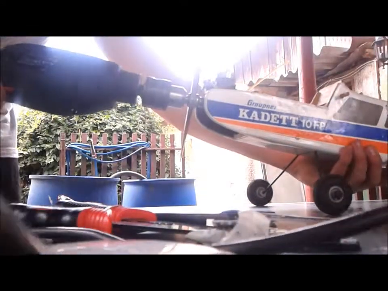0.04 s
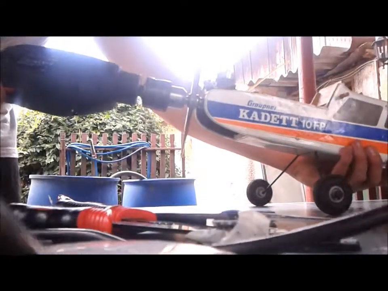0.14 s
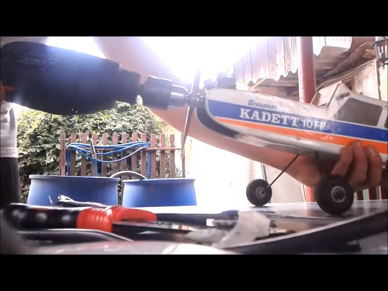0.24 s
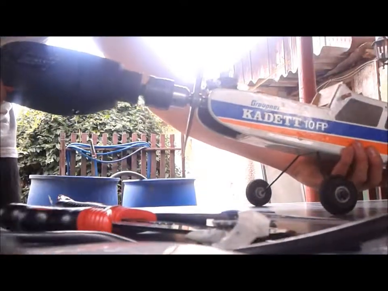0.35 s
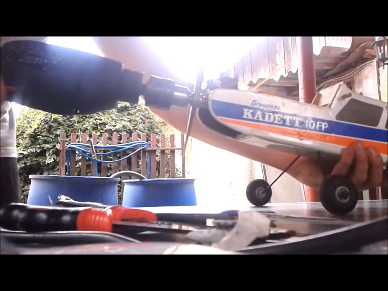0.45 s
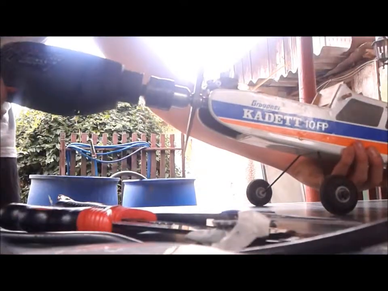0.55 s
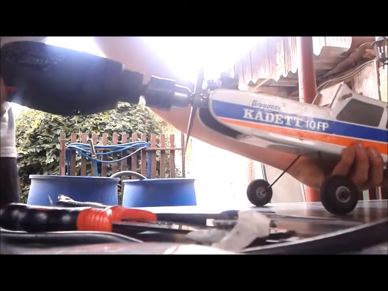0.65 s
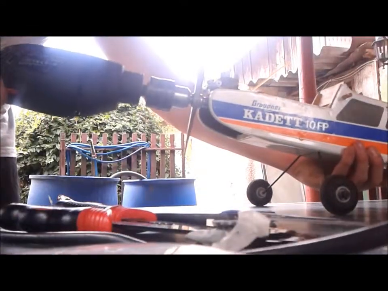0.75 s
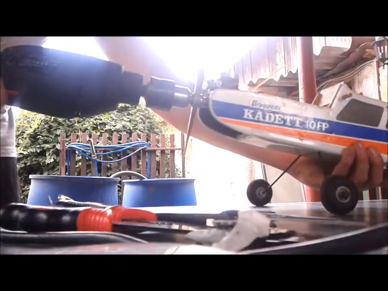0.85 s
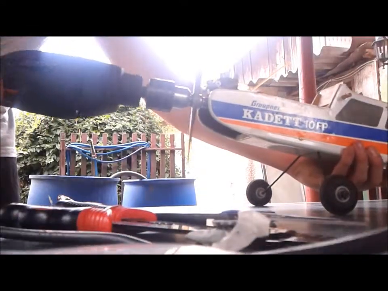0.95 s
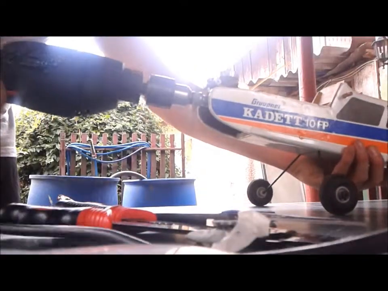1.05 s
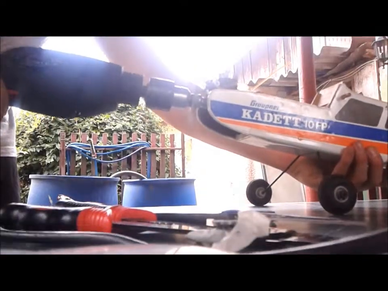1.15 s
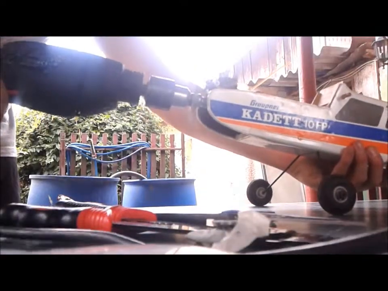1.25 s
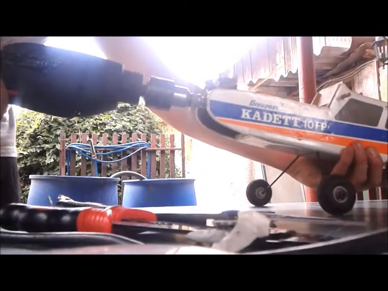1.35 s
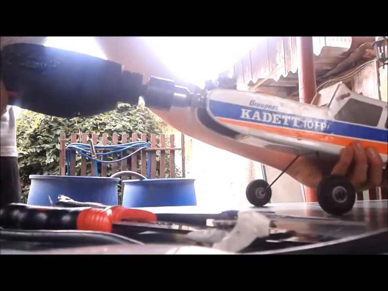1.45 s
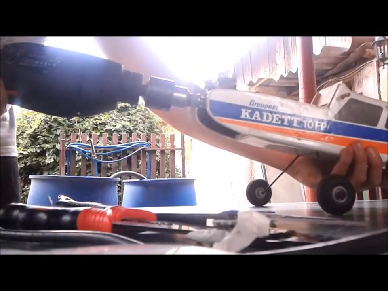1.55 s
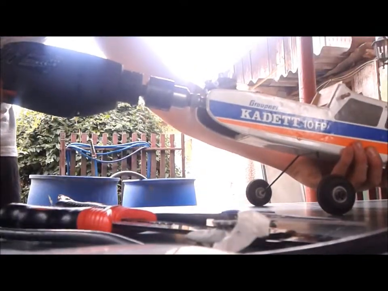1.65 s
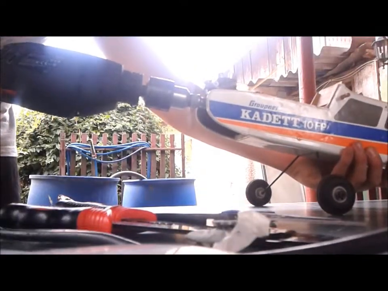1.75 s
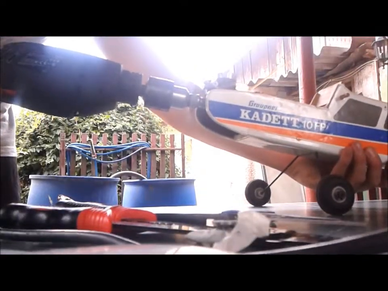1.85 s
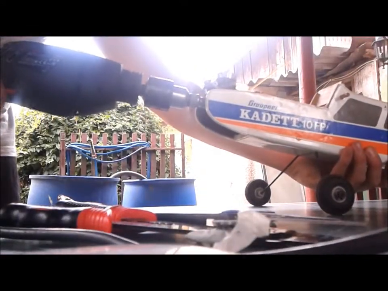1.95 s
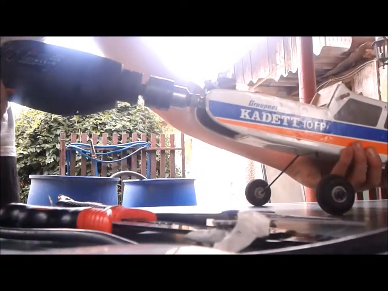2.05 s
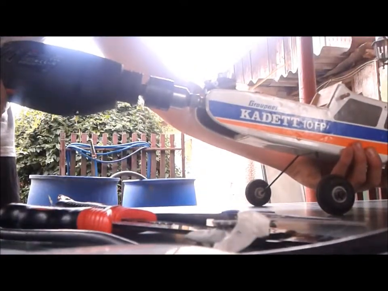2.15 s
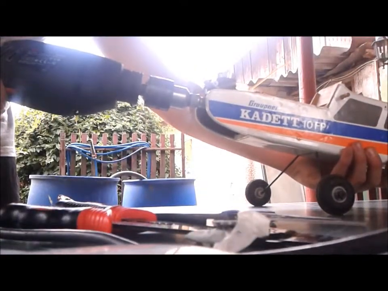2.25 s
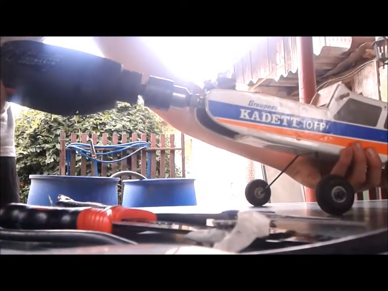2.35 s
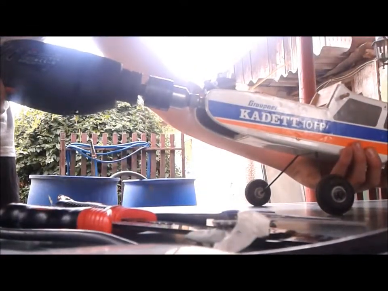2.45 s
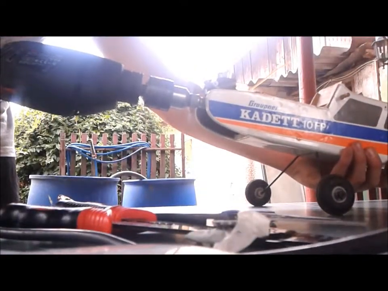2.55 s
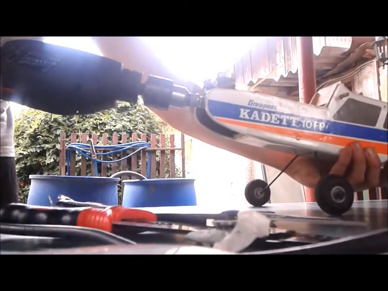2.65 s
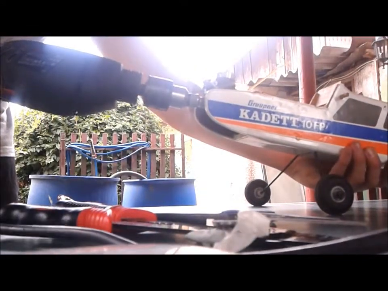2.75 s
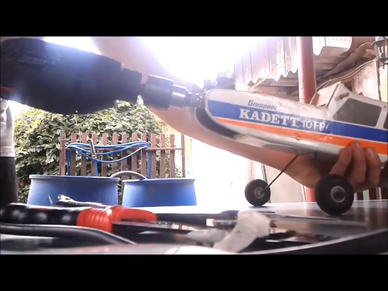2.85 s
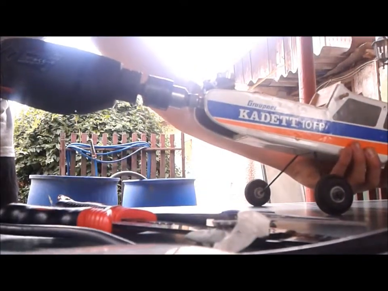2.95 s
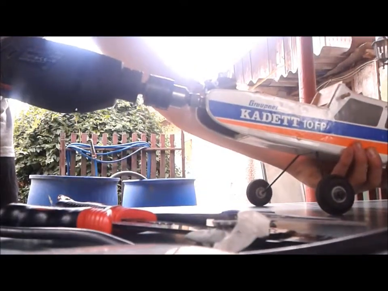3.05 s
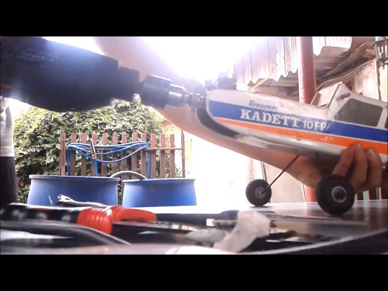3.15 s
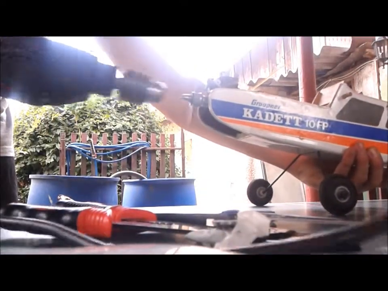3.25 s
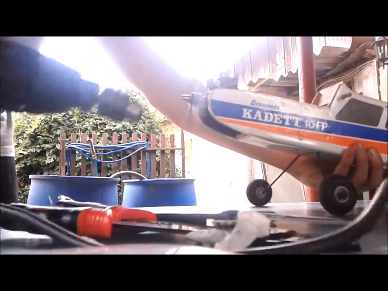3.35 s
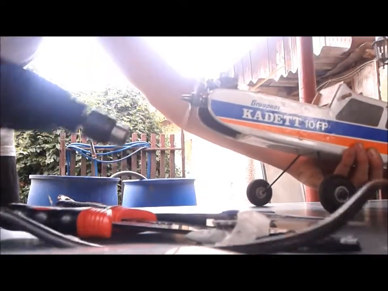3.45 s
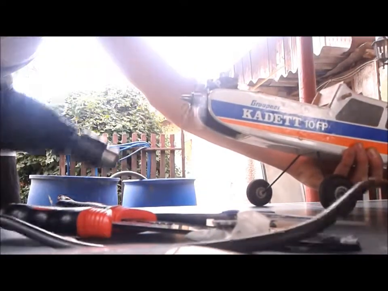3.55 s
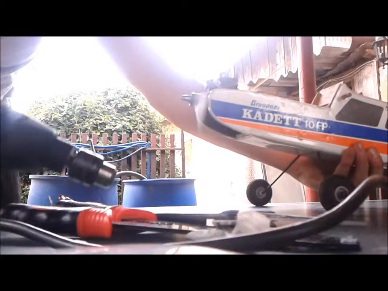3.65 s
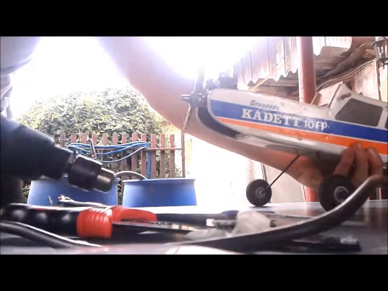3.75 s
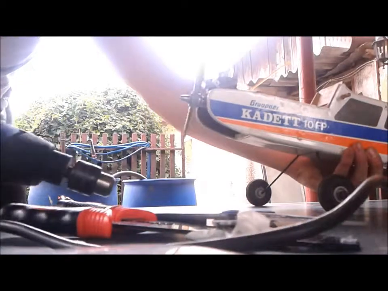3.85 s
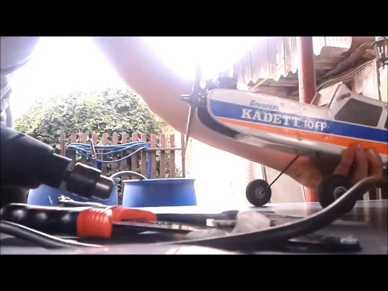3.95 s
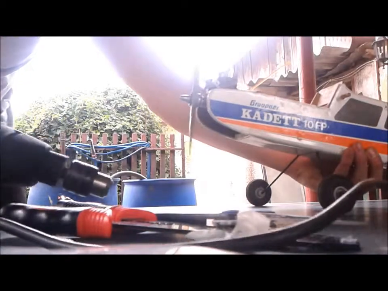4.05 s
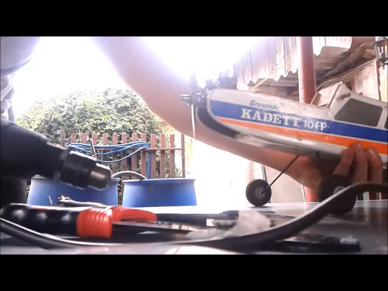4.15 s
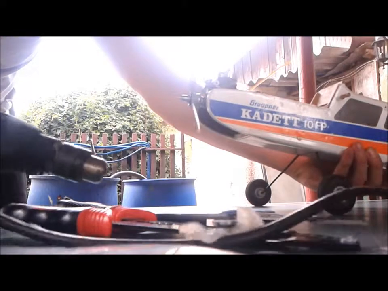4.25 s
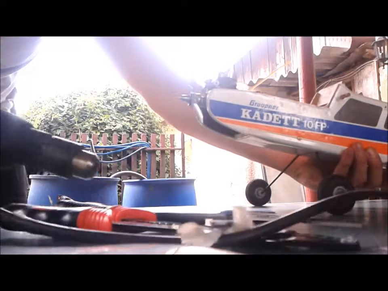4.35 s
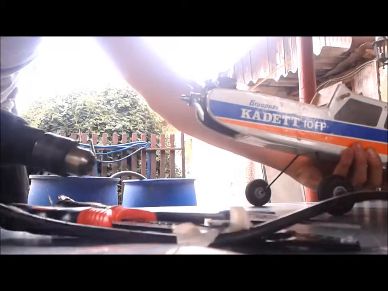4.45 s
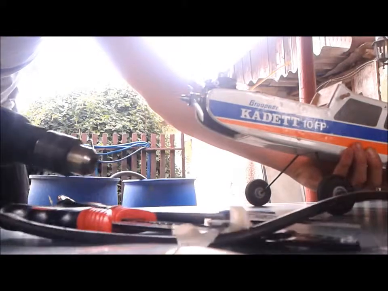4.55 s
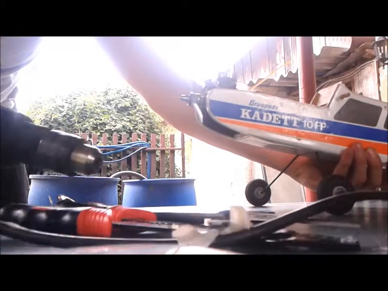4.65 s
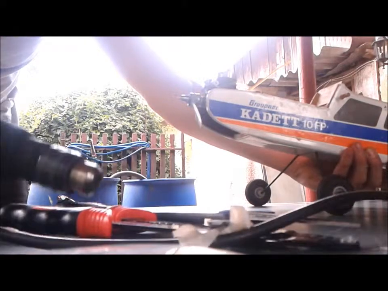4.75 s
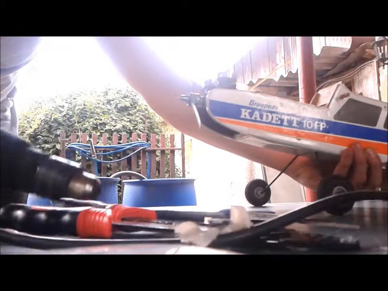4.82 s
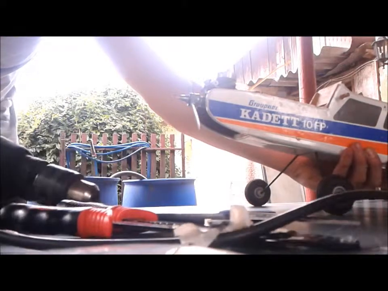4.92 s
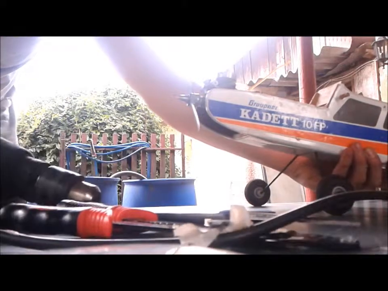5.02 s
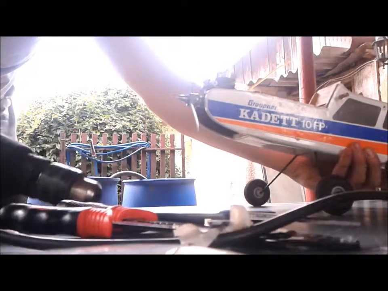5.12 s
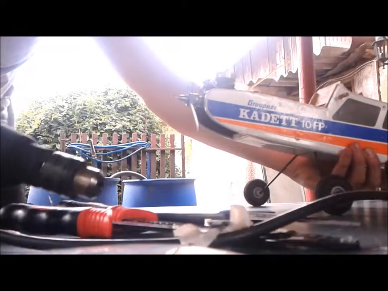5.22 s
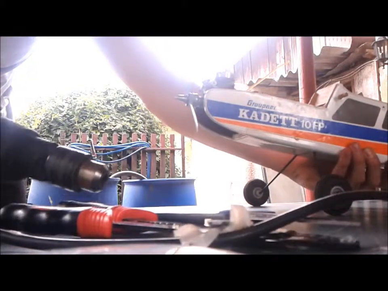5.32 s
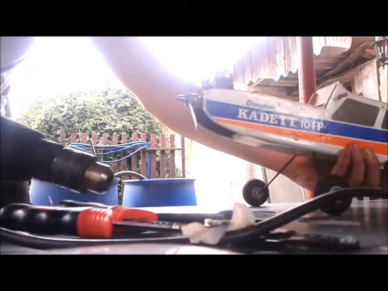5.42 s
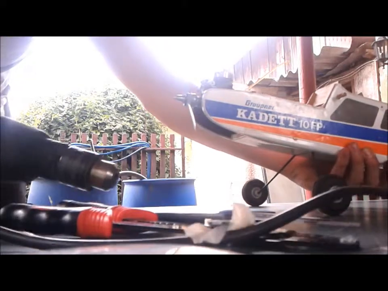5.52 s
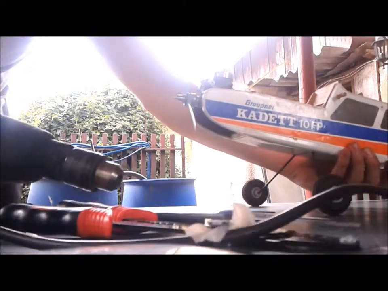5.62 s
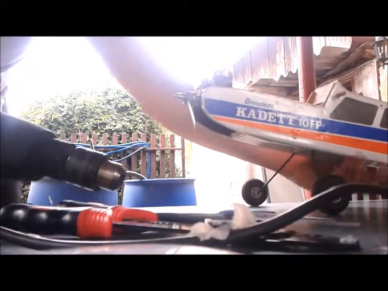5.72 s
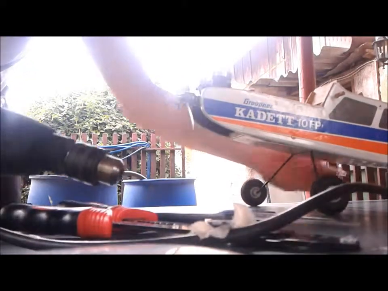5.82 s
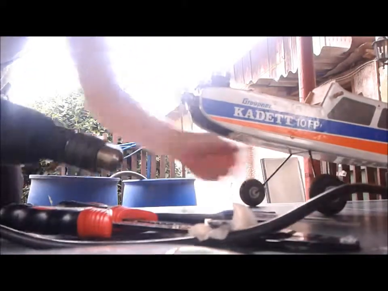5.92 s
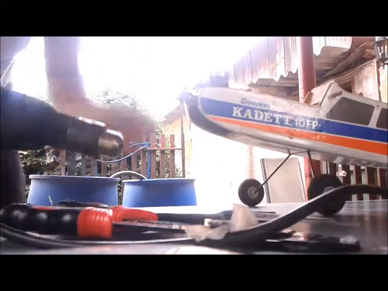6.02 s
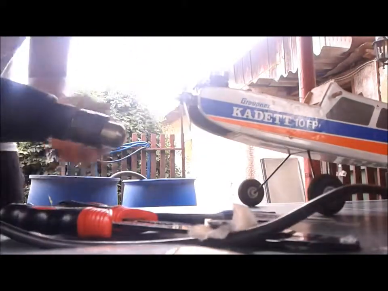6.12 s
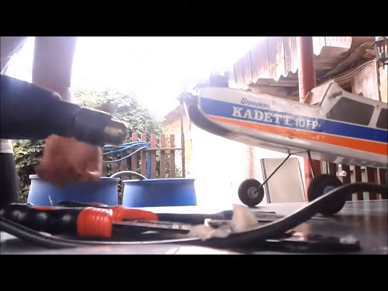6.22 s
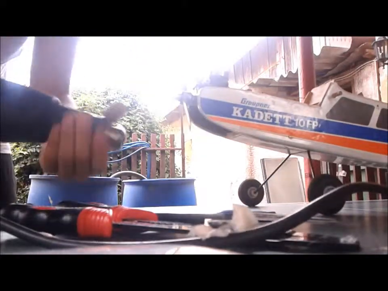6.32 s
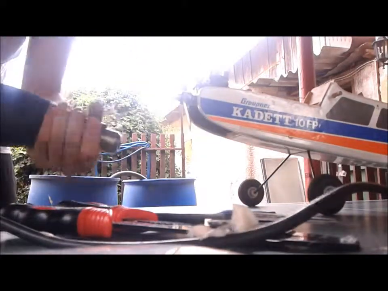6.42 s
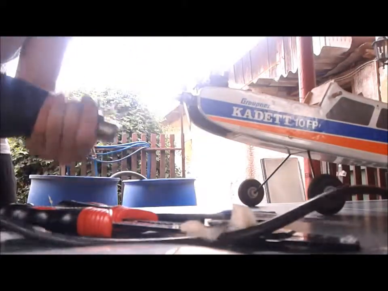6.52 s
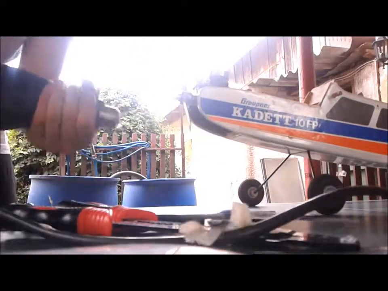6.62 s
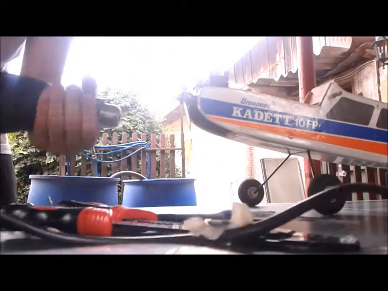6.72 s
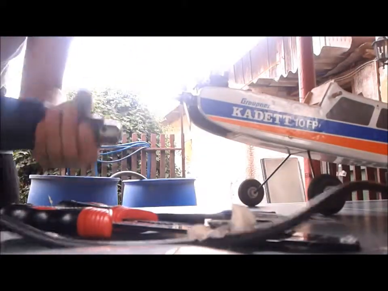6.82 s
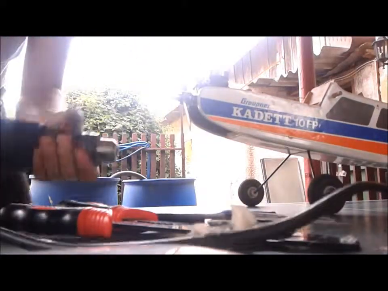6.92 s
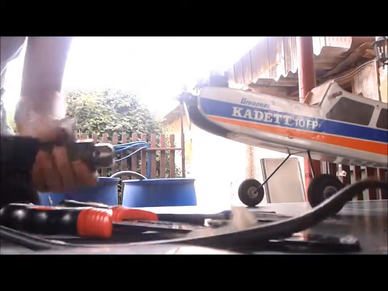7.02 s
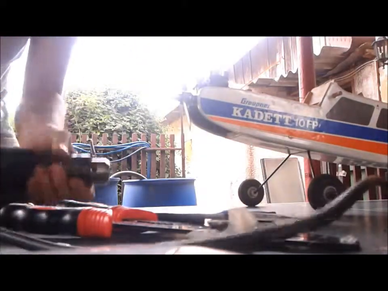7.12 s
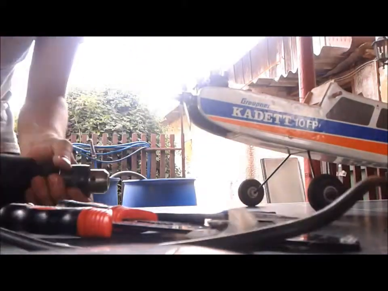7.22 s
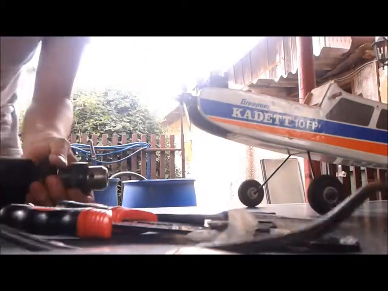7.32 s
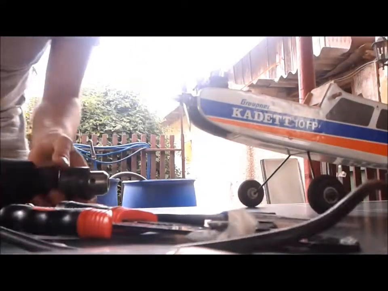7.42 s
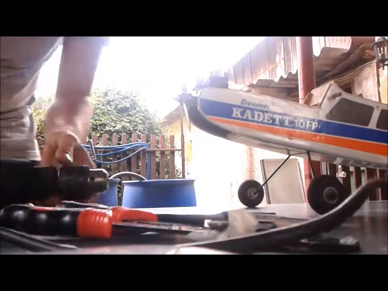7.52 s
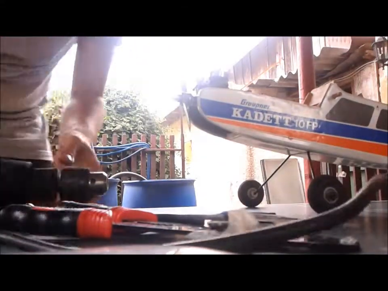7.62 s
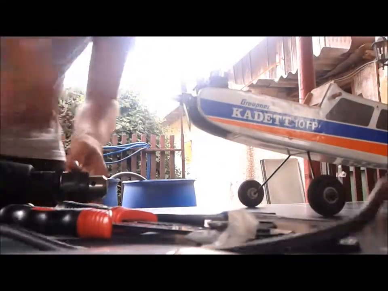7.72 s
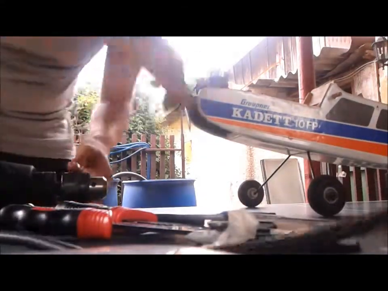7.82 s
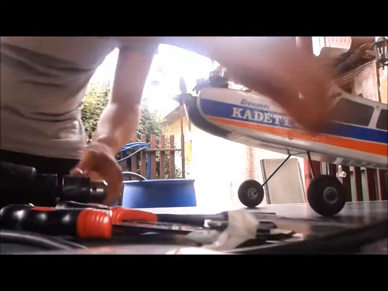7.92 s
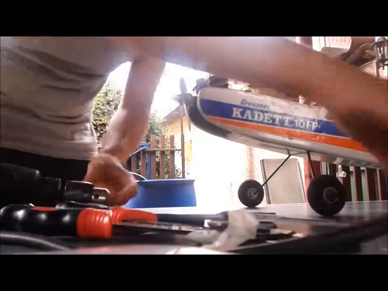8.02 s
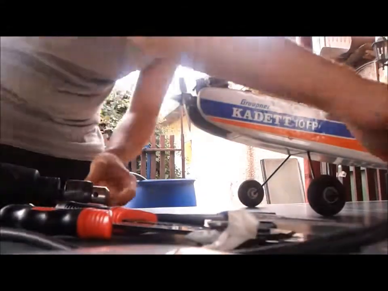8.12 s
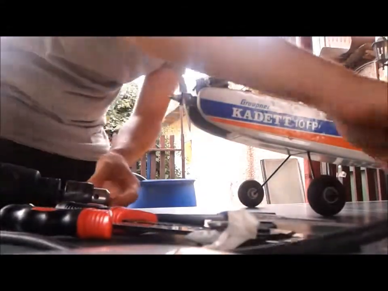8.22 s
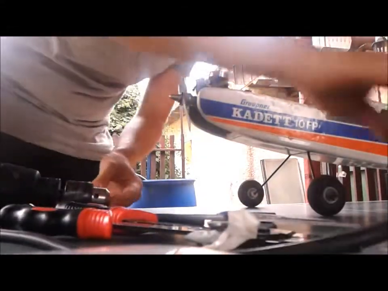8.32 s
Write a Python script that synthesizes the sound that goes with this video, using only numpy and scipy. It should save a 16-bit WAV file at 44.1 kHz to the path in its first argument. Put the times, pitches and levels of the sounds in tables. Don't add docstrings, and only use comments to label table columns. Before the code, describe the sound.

From 0 to 0.8 s, sleeves rub and shift, with dull small knocks around 0.35 s. At 0.86 s the trigger and gears snap and click; a gritty drill burst rises until about 1.06 s with a brief squeal, then sags as it cranks a small engine, puffing and ticking rapidly. A stronger squeeze comes at 1.66-1.93 s, sagging again, then a long one from 2.47 to 3.4 s, climbing to a loud, distorted roar with hiss and whine. Engine puffing ends near 3.15 s as the drill pulls away. From 3.4 s it coasts smoothly down in pitch and level; hard rattling knocks hit at 4.9-4.97 s. At 6.35 s a hand brakes it: groan, gear chatter, sharp catch at 6.5 s, silence of the motor by 7.0 s. Heavy table thuds with clinks cluster at 7.27 s, then sliding, light knocks, a faint skin squeak near 7.97 s, a thump at 8.03 s and a last knock at 8.25 s. Close, dry tabletop pickup, low room noise.

```python
import sys
import numpy as np
from scipy import signal
from scipy.fft import rfft, irfft, next_fast_len
from scipy.io import wavfile
from scipy.ndimage import uniform_filter1d

SR = 44100
rng = np.random.default_rng(int(sys.argv[2]) if len(sys.argv) > 2 else 0)


def unload_audio(sound):
    columns = np.transpose(np.atleast_2d(sound))
    steps = np.round(np.clip(columns, -1, 1) * 32767)
    wavfile.write(sys.argv[1], SR, steps.astype(np.int16))


def elevation(decibels):
    levels = np.asarray(decibels, float)
    return 10 ** (levels / 20)


N = 369116

ENGAGE_S, PART_S, AWAY_S = 0.953, 3.15, 0.52
GRIP_S, STOP_S = 6.38, 7.0


def rms_one(x):
    return x / np.sqrt(np.mean(x ** 2) + 1e-20)


def ramp(start_s, length_s):
    return np.clip((np.arange(N) / SR - start_s) / length_s, 0, 1)


def swells(rows):
    t = np.arange(0, N + 8, 8) / SR
    total = 0
    for at, db, rise, t60 in rows:
        fall_db = 60 * np.clip(t - at - rise, 0, 9) / t60
        total = total + np.clip((t - at) / rise, 0, 1) * elevation(db - fall_db)
    return np.interp(np.arange(N) / SR, t, total)


def colour(x, spectrum, peaks=()):
    size = next_fast_len(N)
    hz = np.arange(1, size // 2 + 2) * SR / size
    knots, level_db = np.transpose(spectrum)
    db = np.interp(np.log(hz), np.log(knots), level_db)
    db -= 30 * np.abs(np.log2(hz / np.clip(hz, knots[0], knots[-1])))
    for top, width, lift_db in peaks:
        db += lift_db / (1 + (2 * (hz - top) / width) ** 2)
    return rms_one(irfft(rfft(x, size) * elevation(db), size)[:N])


def drift(rate):
    r = np.exp(-2 * np.pi * rate / SR)
    return rms_one(signal.lfilter([1], [1, -2 * r, r * r], rng.standard_normal(N + SR))[SR:])


def grains(per_s, spread_db):
    size = elevation(spread_db * np.minimum(rng.exponential(1, N), 5)) * rng.choice([-1, 1], N)
    return size * (rng.random(N) < per_s / SR)


def ring(clicks, hz, t60):
    r, w = elevation(-60 / (t60 * SR)), 2 * np.pi * hz / SR
    return signal.lfilter([0, np.sin(w)], [1, -2 * r * np.cos(w), r * r], clicks + 1e-18)


def strike(events, modes, soft_s):
    s, db = np.transpose(events)
    chance_db = rng.normal(0, 2.5, (len(s), len(modes)))
    out = 0
    for k, (hz, mode_db, t60) in enumerate(modes):
        clicks = np.zeros(N)
        clicks[(s * SR).astype(int)] = elevation(db + mode_db + chance_db[:, k])
        out = out + (-1) ** k * ring(clicks, hz, t60)
    r = np.exp(-1 / (soft_s * SR))
    return signal.lfilter([1 - r], [1, -r], out)


def tones(turns, orders, levels_db, wobble_db):
    waver = np.sqrt(2) * elevation(wobble_db * drift(9.0))
    total = 0
    for k, (times, db) in enumerate(zip(orders, levels_db)):
        sine = np.sin(2 * np.pi * times * turns + k * k)
        total = total + elevation(db) * np.roll(waver, k * SR // 2) * sine
    return total


# frequency in Hz, level in dB per Hz.
FLOOR_SPECTRUM = [(15, -34), (25, -15), (60, -6.5), (202, -13), (378, -25), (584, -30), (1010, -12),
                  (1180, -18), (1470, -16.5), (8370, -39), (12200, -32), (15200, -42), (16500, -58)]


def background():
    floor = elevation(-45.5 - 5) * colour(rng.standard_normal(N), FLOOR_SPECTRUM)
    whine = np.sqrt(2) * elevation(-74) * np.sin(2 * np.pi * 12000 * np.arange(N) / SR)
    return floor + whine


# frequency in Hz, level in dB per Hz.
RUB_SPECTRUM = [(300, 0.5), (480, 1.5), (800, -1.5), (1400, -4.5), (2400, -8.5), (3000, -26.5), (4000, -37)]
# frequency in Hz, level in dB per Hz.
RUSTLE_SPECTRUM = [(3000, 1), (4000, 2.5), (9000, -0.5), (14000, -9), (17000, -2)]
# frequency in Hz, level in dB per Hz.
RUMBLE_SPECTRUM = [(30, -21), (65, -21), (125, 0.5), (300, 2), (450, -10.5)]
RESTLESS_DB = (-54.5, -62, -66.5)
# start in seconds, rub in dB, rise in seconds, t60 in seconds,
# rustle in dB over rub.
RUBS = [(0.0, -40, 0.0013, 0.6, -15), (.14, -34, .19, 0.14, -14), (.33, -30.5, 0.011, 0.4, -40),
        (.46, -46.5, 0.069, .4, -16), (.6, -47, 0.17, 0.81, -23), (6.9, -52, 0.076, 1, -10),
        (7.093, -41, .005, .25, -15), (7.19, -51, 0.042, .2, -9), (7.26, -26, 0.011, 0.38, -15),
        (7.5, -52.5, 0.11, 0.98, -10), (7.73, -46, 0.056, 0.99, -10.5), (8.026, -29.5, 0.0062, 0.52, -30),
        (8.24, -35.5, .01, 0.058, -9)]
# start in seconds, rumble in dB, rise in seconds, t60 in seconds.
SLIDES = [
    (0.0, -51, .002, 1.1),
    (.38, -52, 0.07, 0.57),
    (7.3, -33, 0.12, 0.22),
    (7.72, -37, 0.067, 1.1),
    (8.02, -35, .012, 0.4),
    (8.25, -43, 0.043, .9),
]
# start in seconds, level in dB,
# rise in seconds, t60 in seconds.
SNAPS = [(.8545, -29, .0015, 0.034), (.86, -36, 0.0039, 0.54), (.93, -25, 0.057, 0.41),
         (6.32, -21.5, 0.11, 0.71), (7.098, -50, .001, 0.052), (7.265, -31, .002, .07),
         (7.339, -48, .001, .03), (8.042, -39, 0.011, .5), (8.063, -30, .001, .02)]


def handling():
    rumble, rub, rustle = elevation(np.array(RESTLESS_DB))
    rumble = rumble + swells(SLIDES)
    rub = rub + swells(row[:4] for row in RUBS)
    rustle = rustle + swells(SNAPS)
    rustle = rustle + swells((s, db + over_db, rise, t60) for s, db, rise, t60, over_db in RUBS)
    scratch = rng.standard_normal(N) + .35 * rms_one(grains(1500, spread_db=3.5))
    out = elevation(-5.5 + 2.6 * drift(9.2)) * rumble * colour(rng.standard_normal(N), RUMBLE_SPECTRUM)
    out += rub * colour(scratch, RUB_SPECTRUM)
    return out + elevation(2.0 * drift(25)) * rustle * colour(scratch, RUSTLE_SPECTRUM)


# time in seconds, frequency in Hz, level in dB.
SQUEAK = [
    (7.95, 1510, -72),
    (7.97, 1430, -50),
    (8.01, 1350, -52),
    (8.028, 1370, -58),
]


def squeak():
    t = np.arange(N) / SR
    s, pitch_hz, level_db = np.transpose(SQUEAK)
    hz = np.interp(t, s, pitch_hz)
    db = np.interp(t, s, level_db, left=-120, right=-120)
    return elevation(db + 3 * drift(60)) * np.sin(2 * np.pi * np.cumsum(hz) / SR)


# time in seconds, knock peak in dB, boom in dB over knock,
# metal clink in dB over knock.
BLOWS = [(7.099, -35, -22, 16.5), (7.233, -34.5, -8, 6), (7.265, -6.5, -7, -14), (7.276, -9, -14, 4),
         (7.294, -12.5, -21, -21), (7.325, -32, -12, -1), (7.341, -26, -10, 10), (7.726, -29, -2, -2),
         (7.79, -43, 9, -10), (7.83, -34, 1, -7), (7.858, -42, 8, -1), (7.893, -40, -5, 6),
         (7.993, -35, -3, -4), (8.029, -13, -18, -20), (8.25, -17.5, -22, -20)]
# frequency in Hz, level in dB, t60 in seconds.
TABLE_TOP = [(238, 3, 0.072), (315, -1.2, 0.068), (406, -10, 0.073), (560, -1.5, 0.043), (820, -2.5, 0.02),
             (1080, -9.5, 0.046)]
# frequency in Hz, level in dB, t60 in seconds.
TABLE_FRAME = [(65.4, -3, 0.28), (129.5, 4.5, 0.14)]
# time in seconds, peak in dB.
HELD_BLOWS = [(.332, -19), (.345, -12.5), (.361, -10), (4.903, 2), (4.926, -9), (4.966, -3.5)]
# frequency in Hz, level in dB, t60 in seconds.
HELD_PARTS = [(121, -30, 0.17), (290, -1, 0.01), (500, 1, 0.013), (706, -4.5, 0.033)]
# time in seconds, peak in dB.
TICKS = [(0.856, -27), (0.8707, -18), (0.909, -17), (0.916, -7), (1.0056, -7), (1.0214, -26), (1.0264, -26),
         (6.497, -1), (6.58, -14), (7.2404, -34), (7.2602, -16), (7.325, -18), (7.79, -27), (7.8331, -31),
         (7.8945, -31), (8.0636, -22), (8.0874, -18.5)]
# frequency in Hz, level in dB, t60 in seconds.
CLINK = [(1212, -4.5, 0.031), (1510, 1.5, 0.017), (1770, 1.5, 0.036), (1760, 3.5, 0.02), (2170, 9, 0.004),
         (2420, 4, 0.018), (2870, -0.5, 0.017), (4100, -14, .015), (6800, -11, .012)]
# start in seconds, level in dB, rise in seconds, t60 in seconds.
SHAKES = [(4.922, -4.5, 0.0017, 0.12), (4.958, -11.5, 0.006, 0.075), (5.04, -40, .004, .1),
          (6.33, -25, 0.09, 0.48), (7.266, -30, .002, 0.063), (8.136, -30.5, 0.003, 0.2)]
# frequency in Hz, level in dB per Hz.
SHAKE_SPECTRUM = [(300, -26), (1000, 19), (2500, 15), (3500, 4), (8000, 2), (12000, 5), (16000, 2)]


def knocks():
    s, db, boom_db, clink_db = np.transpose(BLOWS)
    wood = strike(np.c_[s, db - 6], TABLE_TOP, soft_s=.0002)
    wood += strike(np.c_[s, db + boom_db - 1.5], TABLE_FRAME, soft_s=0.00057)
    wood += strike(HELD_BLOWS, HELD_PARTS, soft_s=0.00047)
    clinks = np.r_[np.c_[s, db + clink_db - 13], np.array(TICKS) - [0, 9]]
    metal = strike(clinks, CLINK, soft_s=.00003)
    rattle = rng.standard_normal(N) + rms_one(grains(2500, spread_db=5.0))
    return wood + metal + swells(SHAKES) * colour(rattle, SHAKE_SPECTRUM)


# frequency in Hz, width in Hz, lift in dB.
PUFF_PEAKS = [(132.5, 33, 12.5), (252.6, 53, 22), (380, 78, -5.5)]
# start in seconds, level in dB, rise in seconds, t60 in seconds.
PISTON_STRAINS = [
    (.9, -24, .1, 2.8),
    (1.6, -23, .3, 4.0),
]


def engine(turns):
    gear_ratio = .0968
    held = ramp(ENGAGE_S, .08) * (1 - ramp(PART_S - .04, 0.069))
    stroke = np.diff(np.floor(gear_ratio * turns), prepend=0) * elevation(rng.normal(0, 1.1, N))
    puff = colour(stroke, [(50, -6.5), (100, -14.5), (400, -6.0), (700, -37)], PUFF_PEAKS)
    burst = signal.lfilter([1], [1, -elevation(-60 / (0.0066 * SR))], stroke) * rng.standard_normal(N)
    tick = (elevation(-41) + swells(PISTON_STRAINS)) * colour(burst, ROAR_SPECTRUM)
    return held * (elevation(-27.5) * puff + tick)


# pull in seconds, rotor turns per second then, release in seconds,
# turns per second then, spin-up time in seconds.
SQUEEZES = [
    (.872, 30, 1.06, 298, .1),
    (1.66, 190, 1.93, 385, .17),
    (2.47, 286, 3.4, 482, .3),
]


def rotor_speed():
    t = np.arange(N) / SR
    air_drag = .000978
    pull, low, release, high, _ = np.transpose(SQUEEZES)
    speed = np.interp(t, np.c_[pull, release].ravel(), np.c_[low, high].ravel())
    for on, slow, off, fast, lag in SQUEEZES:
        share = np.expm1(-(t.clip(on, off) - on) / lag) / np.expm1(-(off - on) / lag)
        speed = np.where((t > on) & (t < off), slow + (fast - slow) * share, speed)
    coast = 1 / (1 / high[-1] + air_drag * np.maximum(t - release[-1], 0))
    coast *= np.exp(-(np.maximum(t - GRIP_S, 0) / .38) ** 1.5)
    return np.where(t > release[-1], coast, speed)


def level(law, speed):
    top_speed, full_effort = 480, 2000
    top_db, octave_db, free_db, effort_db, away_db, grip_db = law
    effort = uniform_filter1d(np.clip(np.gradient(speed) * SR / full_effort, 0, 1), size=1300)
    octaves, away = np.log2(np.maximum(speed, 20) / top_speed), ramp(PART_S, AWAY_S)
    moving_db = (octave_db + free_db * away) * octaves + effort_db * effort
    return top_db + moving_db + away_db * away + grip_db * ramp(GRIP_S + .04, .3)


# start in seconds, level in dB, rise in seconds, t60 in seconds.
CHATTER = [
    (6.33, -21, .1, 1.5),
]
# frequency in Hz, level in dB, t60 in seconds.
GEARBOX = [(530, 0, .07), (720, -3, .04), (1320, -1, .04), (1550, -4, .03), (1950, -8, .025),
           (2400, -7, .025), (2900, -7, .025), (4660, -14, .015)]
# time in seconds, peak in dB.
CATCHES = [
    (6.4966, -6),
    (6.581, -12),
]


def brake():
    chatter = 0
    for hz, db, t60 in GEARBOX:
        chatter = chatter + elevation(db) * rms_one(ring(grains(900, spread_db=3.5), hz, t60))
    catches = strike(CATCHES, [(hz, db, t60 / 2) for hz, db, t60 in GEARBOX[2:5]], soft_s=.00005)
    return swells(CHATTER) * (1 - ramp(STOP_S - .07, 0.079)) * rms_one(chatter) + catches


# start in seconds, level in dB, rise in seconds, t60 in seconds.
SQUEALS = [
    (.925, -13, .025, .07),
    (1.662, -12, .006, .14),
]
# start in seconds, level in dB, rise in seconds, t60 in seconds.
FAN_BITES = [
    (1.73, -30, .06, 2.6),
    (2.49, -27, .05, 2.6),
]


def squeal(turns):
    pulse = 1 + .6 * np.cos(2 * np.pi * 100 * (np.arange(N) / SR - .0085))
    start = swells(SQUEALS) * pulse * np.sin(2 * np.pi * 12 * turns + .5 * drift(150))
    held = swells(FAN_BITES) * np.sin(2 * np.pi * FAN[0] * turns + 1.0 * drift(120))
    return np.sqrt(2) * (start + held)


# frequency in Hz, level in dB per Hz.
ROAR_SPECTRUM = [(24, -51), (40, -27), (92, -19), (124, -19), (210, -16), (244, -10), (462, -3.5),
                 (518, -3.5), (928, 3), (1020, 2), (1460, 0), (3600, -11.5), (4680, -18), (7920, -120)]
# frequency in Hz, level in dB per Hz.
HISS_SPECTRUM = [(2600, -7), (3300, -5.5), (4480, -1.5), (5880, -2), (8250, 0.5), (9500, -3), (11300, -4.5),
                 (13500, -5.5), (16000, -12)]
# frequency in Hz, width in Hz, lift in dB.
HOUSING = [(593, 440, 3.5), (1500, 470, 5.5), (2228, 430, 5.5), (2756, 91, 3.5), (3457, 120, -9),
           (4544, 590, 5), (8200, 300, -1.5)]
# start in seconds, level in dB, rise in seconds, t60 in seconds.
JOLTS = [
    (.864, -25, .008, 0.091),
    (.9, -16, 0.0043, 0.037),
    (1.0, -14.5, 0.027, 0.048),
]
# start in seconds, level in dB, rise in seconds, t60 in seconds.
GROAN = [
    (6.35, -24, .07, .8),
]
# multiples of rotor speed, then their levels in dB over the unbalance tone.
UNBALANCE = (1, 2, 3, 4)
UNBALANCE_DB = [0, -1, -2, -9]
# multiples of rotor speed, then their levels in dB over the whine.
SLOTS = (11, 11.5, 12, 24, 25, 48, 60, 72)
SLOTS_DB = [-8, -8, 0, -4, -12, -21, -20, -28]
# multiples of rotor speed, then their levels in dB over hiss.
FAN = (35, 36)
FAN_DB = [-23, -27]
# rotor turns per second, width in turns per second, lift in dB.
BEARING_SINGS = (238, 26, 9)
# dB at top speed, dB per octave of speed, extra dB per octave once away,
# dB at full effort, dB once away, dB once gripped. First the gear roar.
ROAR_LAW = (-7.5, 11.5, 1.08, 2.5, 0, 6.5)
HISS_LAW = (-8.5, -0.37, 2.5, 0, 6, 4)
SPARKLE_LAW = (6.5, 2, 0.5, 0, -11.5, -26)
TONE_LAW = (-17.5, 20, 1.7, -3, 0.5, -11)
WHINE_LAW = (-58, 0, -14, -12, 9, -62)


def drill(turns, speed):
    running = ramp(SQUEEZES[0][0] - .012, 0.02) * (1 - ramp(STOP_S - .1, 0.076))
    beat = elevation(1.2 * np.sin(2 * np.pi * turns) + 0.28 * drift(38))
    teeth = rng.standard_normal(N) + .5 * rms_one(grains(2500, spread_db=1.0))
    roar_db = level(ROAR_LAW, speed)
    roar = (elevation(roar_db) + swells(JOLTS)) * colour(beat * teeth, ROAR_SPECTRUM, HOUSING)

    bearing_db = -29
    at, width, lift_db = BEARING_SINGS
    away = ramp(PART_S, AWAY_S)
    balls_db = bearing_db - 3 * (1 - away) + lift_db * away * np.exp(-((speed - at) / width) ** 2)
    sparks = rng.standard_normal(N) + 0.64 * rms_one(grains(3000, spread_db=-0.5))
    hiss = colour(elevation(0.67 * drift(60)) * sparks, HISS_SPECTRUM, HOUSING)
    top = signal.sosfiltfilt(signal.butter(2, 9500, "high", fs=SR, output="sos"), hiss)
    top_db = level(SPARKLE_LAW, speed) + 0.22 * (balls_db - bearing_db)
    hiss += (elevation(top_db) - 1) * top + tones(turns, FAN, FAN_DB, wobble_db=4)

    passes = 3.545 * turns + .022 * drift(70)
    orders = np.arange(7, 21)
    hiss += elevation(balls_db) * tones(passes, orders, np.maximum(orders - 11, 0) * -.7, wobble_db=5)
    rotor = elevation(level(TONE_LAW, speed)) * tones(turns, UNBALANCE, UNBALANCE_DB, wobble_db=2)
    rotor += elevation(level(WHINE_LAW, speed)) * tones(turns, SLOTS, SLOTS_DB, wobble_db=3.5)
    rotor += swells(GROAN) * tones(passes, (1, 2, 4), [0, -4, -6], wobble_db=3)
    return running * (roar + elevation(roar_db + level(HISS_LAW, speed)) * hiss + rotor)


# delay in seconds, level in dB.
ECHOES = [(.0061, -6.5), (0.0169, -11.5), (.031, -13.5), (.049, -16)]


def scene():
    speed = rotor_speed()
    turns = np.cumsum(speed) / SR
    motor = drill(turns, speed) + squeal(turns) + brake()
    sharp = engine(turns) + knocks()
    sharp += sum(elevation(db) * np.pad(sharp, (int(s * SR), 0))[:N] for s, db in ECHOES)
    return np.tile(motor + sharp + handling() + squeak() + background(), (2, 1))


def thin_treble(x):
    hz, _, cells = signal.stft(x, SR, nperseg=2048, noverlap=1024)
    power = np.abs(cells) ** 2
    narrow = uniform_filter1d(power, size=9, axis=0)
    broad = uniform_filter1d(power, size=50, axis=0)
    threshold = np.interp(hz, [2800, 3300, 9000, 11000], [0, .24, .42, .66])[:, None]
    dropped = narrow < broad * threshold
    cells = cells * ~dropped * (hz < 15850)[:, None]
    return signal.istft(cells, SR, nperseg=2048, noverlap=1024)[1][:N]


def top_cut(x):
    return signal.sosfilt(signal.butter(12, 16740, fs=SR, output="sos"), x)


def record(dry):
    overloaded = np.clip(dry[0], -1.0, 1.0)
    flattened = np.clip(thin_treble(overloaded), -1.0, 1.0)
    return top_cut(np.tile(flattened, (2, 1)))


dry = scene()
out = record(dry)
unload_audio(out)
```